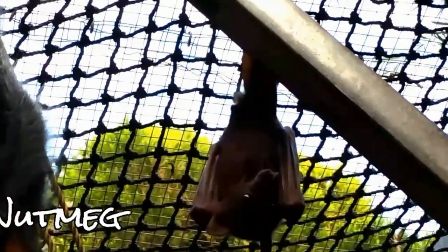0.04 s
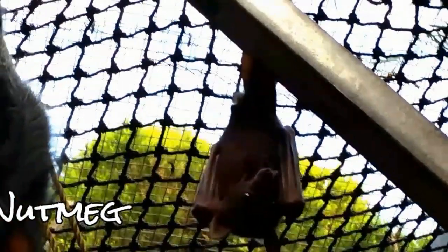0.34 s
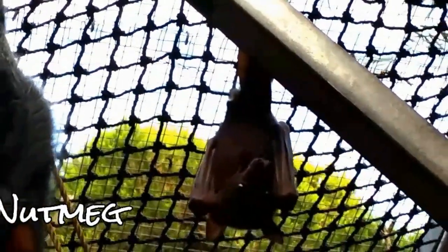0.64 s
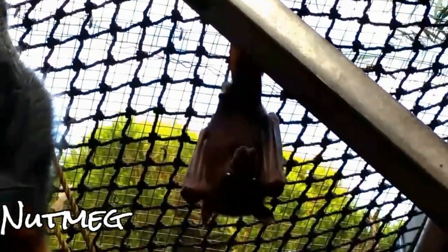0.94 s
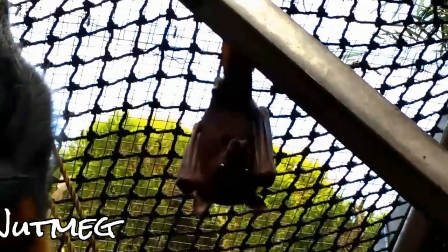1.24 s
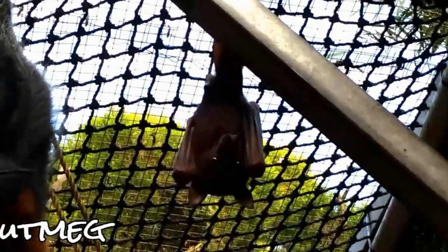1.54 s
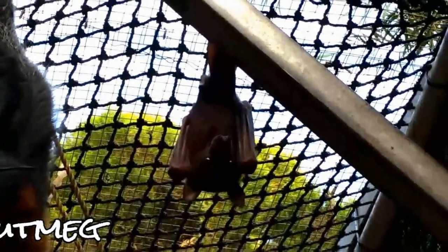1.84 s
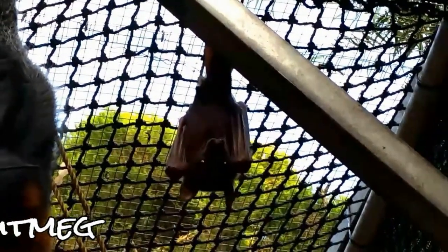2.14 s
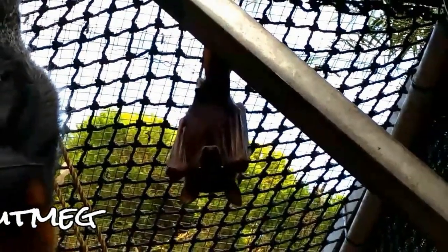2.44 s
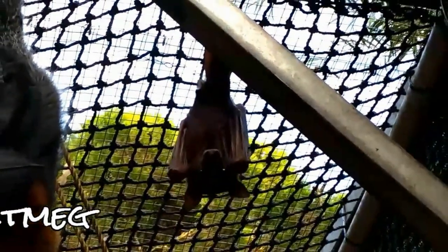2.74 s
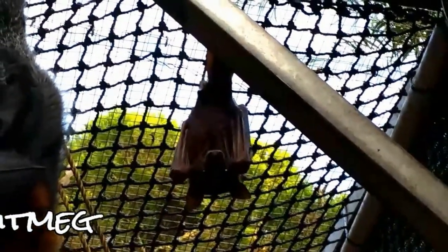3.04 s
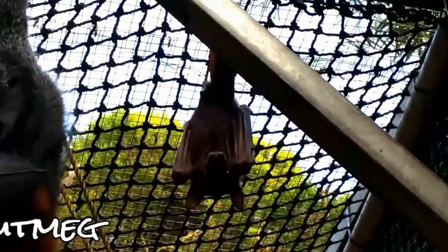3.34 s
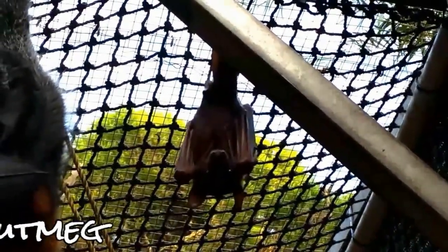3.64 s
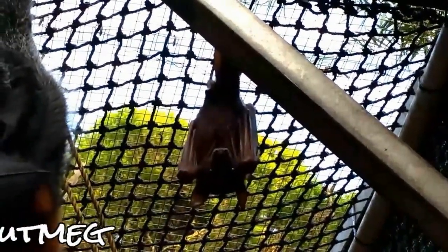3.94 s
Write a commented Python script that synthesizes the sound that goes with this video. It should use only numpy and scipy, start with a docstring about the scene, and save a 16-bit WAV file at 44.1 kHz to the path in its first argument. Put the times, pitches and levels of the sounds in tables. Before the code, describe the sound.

A distant engine throbs low over traffic hum, with faint rustles and soft microphone bumps.

```python
"""Outdoors by a netted animal enclosure. A distant engine throbs as its exhaust orders line up once
per cycle, then slows to a lower speed, over a wash of far traffic and a thin hiss. Close on the
right something rustles: clumps of tiny slips make short crisp crackles over softer sliding.
A few soft handling bumps reach the microphone, some with a dull rub."""
import sys
import numpy as np
from scipy import signal
from scipy.fft import rfft, irfft
from scipy.io import wavfile

SR = 44100
rng = np.random.default_rng(int(sys.argv[2]) if len(sys.argv) > 2 else 0)


def pcm_store(signal):
    """Save signal as 16-bit PCM."""
    levels = np.round(np.clip(np.atleast_2d(signal), -1, 1) * 32767)
    wavfile.write(sys.argv[1], SR, levels.astype(np.int16).T)


N = 176400
TIME_S = np.arange(N) / SR
BIN_HZ = np.arange(N // 2 + 1) * SR / N


def from_db(db):
    """Decibels to gain."""
    return 10 ** (np.asarray(db) / 20)


def unit_rms(x):
    """Scale to unit power."""
    return x / np.sqrt(np.mean(x ** 2) + 1e-20)


def per_sample(rows):
    """Interpolate each value column over time."""
    times_s, *columns = np.transpose(rows)
    return [np.interp(TIME_S, times_s, column) for column in columns]


def per_bin(rows):
    """Interpolate a table over log frequency."""
    hz, values = np.transpose(rows)
    return np.interp(np.log(BIN_HZ + 1), np.log(hz), values)


def pan(left_db):
    """Stereo gains of unit mean power; positive is left."""
    return unit_rms(from_db([[left_db / 2], [-left_db / 2]]))


def colour(x, spectrum):
    """Minimum-phase filter that keeps the power of white noise."""
    gain = unit_rms(from_db(per_bin(spectrum)))
    cepstrum = irfft(np.log(gain))
    cepstrum[1:N // 2] *= 2
    cepstrum[N // 2 + 1:] = 0
    return irfft(rfft(x) * np.exp(rfft(cepstrum)))


def drift(rate_hz):
    """Slow random wander, unit RMS."""
    white = rfft(rng.standard_normal(N))
    return unit_rms(irfft(white / (1 + (BIN_HZ / rate_hz) ** 2)))


def bursts(rows, attack_s, release_s):
    """Attack-hold-release envelopes, summed in power."""
    power = 0
    for start_s, db, length_s in rows:
        age_s = TIME_S - start_s
        attack = np.clip(age_s / attack_s, 0, 1)
        release = np.exp(-np.clip((age_s - length_s) / release_s, 0, 20))
        power += (from_db(db) * attack * release) ** 2
    return np.sqrt(power)


def friction(slips_per_s, noise_gain):
    """Tiny random slips over smooth noise; stereo, unit RMS."""
    slipping = rng.random(N) < slips_per_s / SR
    slips = unit_rms(slipping * rng.standard_normal((2, N)))
    return unit_rms(slips + noise_gain * rng.standard_normal((2, N)))


# Engine speed: (time [s], cycle rate [Hz])
ENGINE_RATE = [(0, 13.8), (.6, 14.45), (1.4, 14.7), (1.7, 15.1), (2.0, 14.5), (2.4, 13.2), (2.8, 12.4),
               (3.05, 11.0), (4, 11.1)]
# Strong exhaust orders: (time [s], third [dB], fourth [dB], fifth [dB])
STRONG_ORDERS = [(.06, -45, -36, -34.5), (.28, -42, -31, -38), (.48, -42, -33.5, -39.5),
                 (.68, -42, -30, -34), (1.1, -39.5, -29.5, -36), (1.45, -44, -32, -37.5),
                 (1.6, -50, -39, -44), (1.8, -44, -41, -43), (2.0, -35.5, -36.5, -48),
                 (2.45, -38.5, -41, -50), (2.78, -39, -35.5, -41), (3.0, -45, -48, -50),
                 (3.17, -48, -37, -44), (3.4, -43, -35, -45), (3.8, -50, -37, -46), (4, -50, -39, -47)]
# Weak exhaust orders: (order [x cycle rate], level [dB re fourth])
WEAK_ORDERS = [(2, -24), (6, -27), (7, -31.5), (8, -18.5), (9, -20), (10, -31.5), (12, -26.5), (13, -29.5)]


def engine(first_throb_s=.06688, roughness=.09):
    """Three strong exhaust orders align once per cycle; weak ones take random phases. All waver."""
    rate_hz, = per_sample(ENGINE_RATE)
    cycles = np.cumsum(rate_hz) / SR
    phase = 2 * np.pi * (cycles - np.interp(first_throb_s, TIME_S, cycles))
    third_db, fourth_db, fifth_db = per_sample(STRONG_ORDERS)
    orders = [(3, third_db, 0), (4, fourth_db, 0), (5, fifth_db, 0)]
    orders += [(order, fourth_db + db, 2 * np.pi * rng.random()) for order, db in WEAK_ORDERS]
    exhaust = 0
    for order, db, offset_rad in orders:
        amplitude = np.sqrt(2) * from_db(db) * (1 + roughness * drift(rate_hz=12))
        exhaust += amplitude * np.sin(order * phase + offset_rad + roughness * drift(rate_hz=12))
    return exhaust * pan(left_db=-1.9)


# Traffic spectrum: (frequency [Hz], relative density [dB])
TRAFFIC_SPECTRUM = [(20, -0.5), (32, -1), (60, 1.5), (95, -14), (150, -11.5), (220, -17), (320, -20),
                    (560, -20.5), (800, -26.5), (1050, -33), (1400, -43), (2000, -46.5), (3000, -46),
                    (4000, -78.5)]
# Traffic envelope: (time [s], level [dB])
TRAFFIC_ENVELOPE = [(0, -43.5), (.8, -43), (1.5, -44), (2.1, -45.5), (2.6, -45), (3.1, -45.5), (4, -45.5)]
# Traffic stereo image: (frequency [Hz], left-right correlation [-1..1])
TRAFFIC_CORRELATION = [(60, 0.81), (110, 0.98), (180, 0.1), (320, 0.28), (560, -0.48), (980, -0.17),
                       (1700, -0.079)]


def traffic():
    """Far traffic wash, near mono in the bass and wide above."""
    mid, side = rfft(rng.standard_normal((2, N)))
    correlation = per_bin(TRAFFIC_CORRELATION)
    noise = irfft(np.sqrt(1 + correlation) * mid + np.sqrt(1 - correlation) * side * [[1], [-1]])
    level_db, = per_sample(TRAFFIC_ENVELOPE)
    gain = from_db(level_db + .5 * drift(rate_hz=4.1))
    return colour(noise, TRAFFIC_SPECTRUM) * gain * pan(left_db=1.1)


# Mid hiss spectrum: (frequency [Hz], relative density [dB])
MID_HISS_SPECTRUM = [(1000, -25.5), (1500, -16.5), (2000, -6), (2300, 2), (2520, 5.5), (2700, -3),
                     (2950, -7), (3300, -32), (4100, -33.5), (5000, -49.5)]
# High hiss spectrum: (frequency [Hz], relative density [dB])
HIGH_HISS_SPECTRUM = [(4300, -30.5), (5000, -16), (5600, -5), (6500, -3.5), (7500, -1), (8450, -3),
                      (8700, -40), (10000, -53)]


def hiss(mid_db=-67.5, high_db=-74):
    """Two steady noise bands, the lower one to the left."""
    mid = colour(rng.standard_normal((2, N)), MID_HISS_SPECTRUM) * from_db(mid_db)
    high = colour(rng.standard_normal((2, N)), HIGH_HISS_SPECTRUM) * from_db(high_db)
    return mid * pan(left_db=8.5) + high


# Crackles: (time [s], level [dB], length [s])
CRACKLE_BURSTS = [(.136, -49, .016), (.161, -52, .006), (.181, -49, .005), (.229, -47, .003),
                  (.246, -47, .009), (.2555, -34.5, .004), (.2995, -38, .003), (.312, -44, .006),
                  (.321, -42, .013), (.325, -35, .004), (.3475, -30.5, .002), (.353, -38, .002),
                  (.366, -41, .007), (.604, -49, .004), (.629, -41, .003), (.634, -40, .003),
                  (.642, -39, .003), (.686, -50, .003), (.702, -50, .003), (.718, -46, .003),
                  (.724, -46, .003), (.754, -40, .003), (1.381, -61, .004), (1.767, -44, .004),
                  (1.775, -48, .011), (1.8275, -44, .003), (1.965, -56, .004), (2.016, -52, .007),
                  (2.502, -57, .004)]
# Sliding envelope: (time [s], level [dB])
SLIDING_ENVELOPE = [(.12, -67), (.145, -62), (.2, -58), (.35, -54), (.41, -68), (.54, -64), (.58, -66.5),
                    (.7, -58), (.88, -65), (1.0, -71.5), (1.17, -67.5), (1.5, -83.5), (1.78, -73),
                    (1.85, -68.5), (2.15, -78), (2.48, -80.5), (2.52, -71), (2.85, -76), (2.95, -75),
                    (3.4, -88)]
# Rustle spectrum: (frequency [Hz], relative density [dB])
RUSTLE_SPECTRUM = [(400, -34), (1500, -27), (2700, -23), (3500, -33), (4300, -43), (5300, -30), (6400, -20),
                   (7200, -4), (7900, 0), (8400, 0), (8900, -18)]


def rustle():
    """Clumps of tiny slips crackle on the right, over softer sliding."""
    crackle_gain = bursts(CRACKLE_BURSTS, attack_s=.00065, release_s=.00058)
    crackles = friction(slips_per_s=3500, noise_gain=.6) * crackle_gain
    sliding_db, = per_sample(SLIDING_ENVELOPE)
    sliding = friction(slips_per_s=4100, noise_gain=1) * from_db(sliding_db + 3.9 * drift(rate_hz=35))
    return colour(crackles * pan(left_db=-16.5) + sliding * pan(left_db=-2), RUSTLE_SPECTRUM)


# Handling bumps: (time [s], level [dB], pitch [Hz], left over right [dB])
HANDLING_BUMPS = [(.3783, -23.5, 700, 8), (.670, -41, 240, 4), (.680, -31, 220, 3), (.860, -26, 185, 4),
                  (.882, -34, 260, 6), (.898, -33, 210, 6), (2.742, -29.5, 150, 7), (2.7455, -29.5, 580, 8)]


def handling_bumps(rise_cycles=.6, right_lag_s=.00065):
    """Each bump is a short damped swing that reaches the left first."""
    lag_s = np.array([[0], [right_lag_s]])
    bumps = np.zeros((2, N))
    for start_s, db, hz, left_db in HANDLING_BUMPS:
        cycles = hz * np.maximum(TIME_S - start_s - lag_s, 0)
        rise = np.minimum(cycles / rise_cycles, 20)
        envelope = from_db(db) * (rise * np.exp(1 - rise)) ** 2
        bumps -= envelope * np.sin(2 * np.pi * cycles) * pan(left_db)
    return bumps


# Handling rubs: (time [s], level [dB], length [s])
RUB_BURSTS = [(.65, -46.5, 0.047), (.859, -38.5, .055), (2.744, -41, .008)]
# Rub spectrum: (frequency [Hz], relative density [dB])
RUB_SPECTRUM = [(60, -5), (140, 3), (260, -2), (450, -10), (900, -13), (1500, -27), (2500, -42),
                (4000, -65)]


def handling_rubs():
    """Sparse slips make a dull rub alongside some bumps."""
    envelope = bursts(RUB_BURSTS, attack_s=.0032, release_s=.008)
    rubs = friction(slips_per_s=300, noise_gain=.45) * envelope
    return colour(rubs, RUB_SPECTRUM) * pan(left_db=6.5)


def scene():
    """All sources at the microphone."""
    return engine() + traffic() + hiss() + rustle() + handling_bumps() + handling_rubs()


def record(dry):
    """Steep elliptic low-pass."""
    cutoff_hz = 8872
    return signal.sosfilt(signal.ellip(10, .1, 80, cutoff_hz, fs=SR, output="sos"), dry)


dry = scene()
out = record(dry)
pcm_store(out)
```